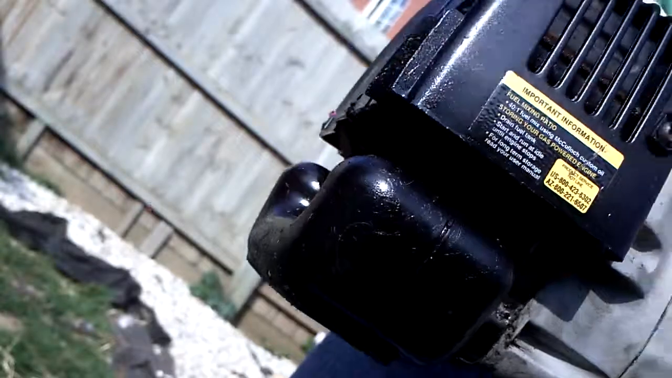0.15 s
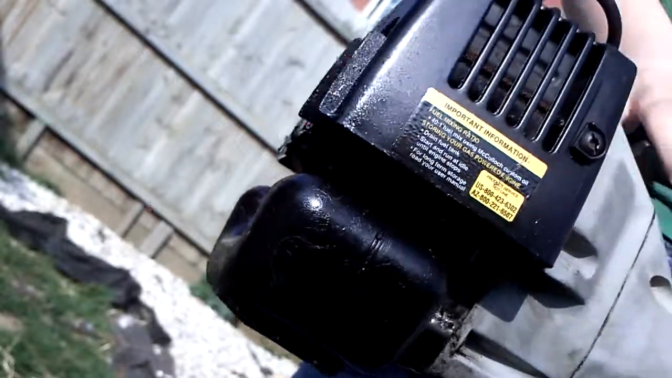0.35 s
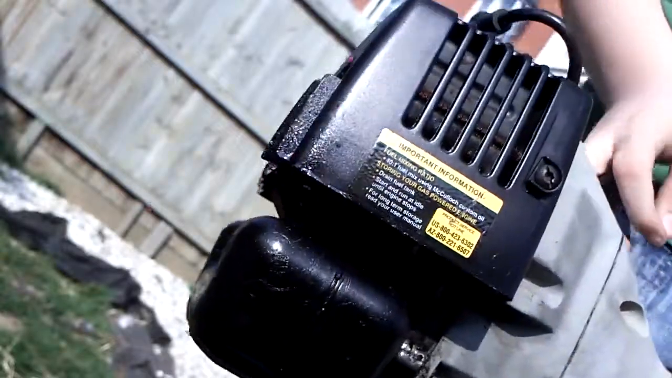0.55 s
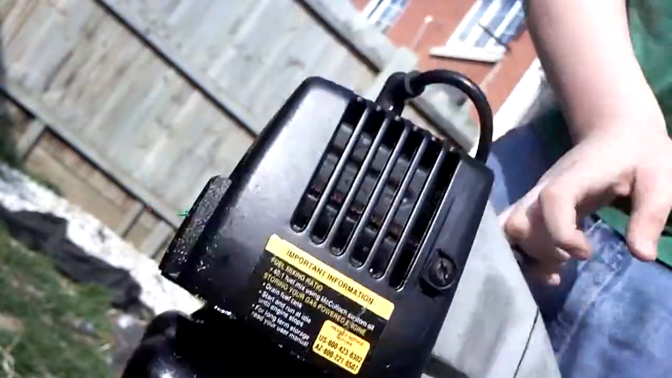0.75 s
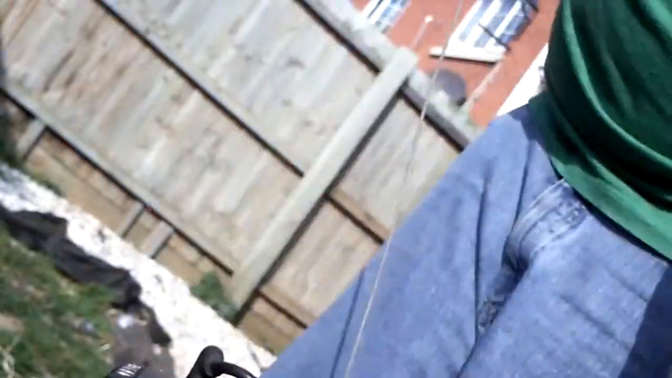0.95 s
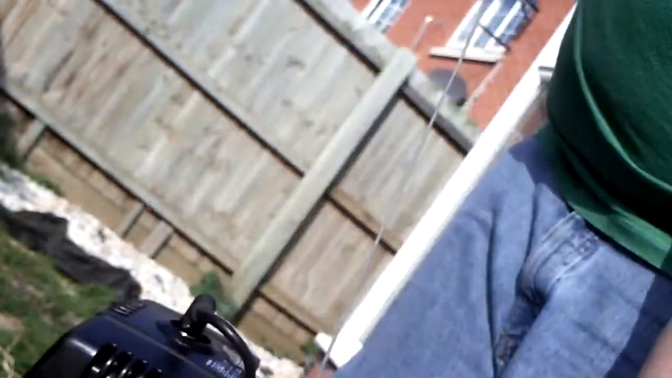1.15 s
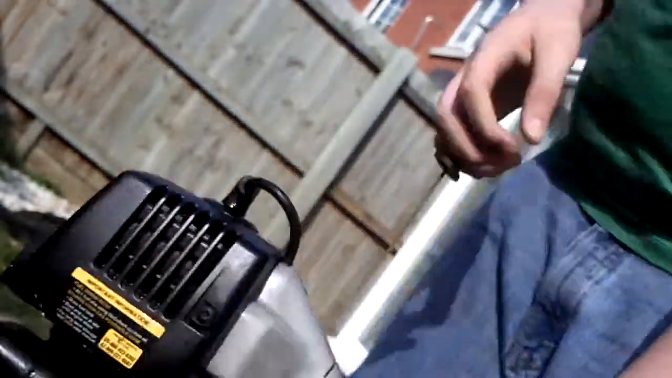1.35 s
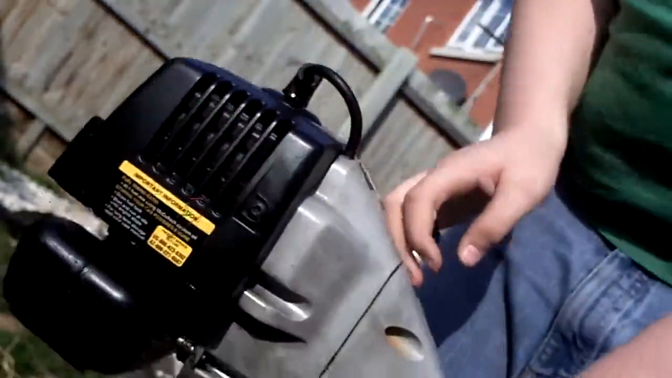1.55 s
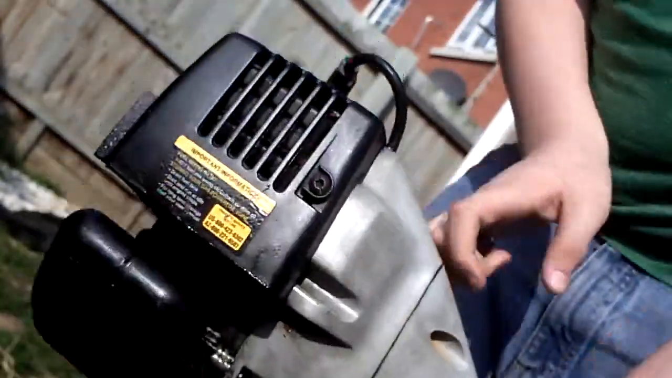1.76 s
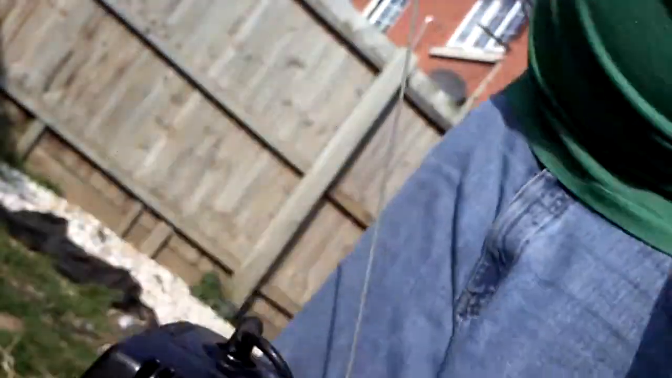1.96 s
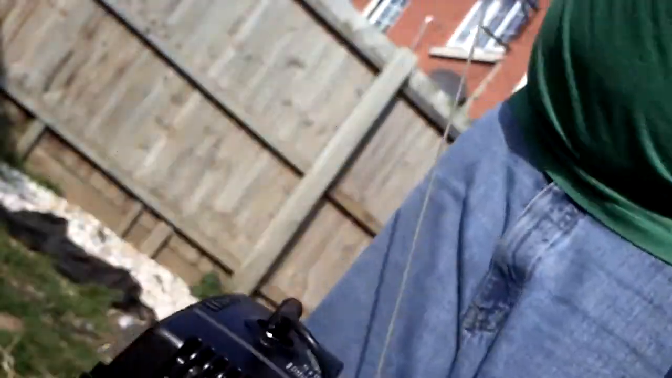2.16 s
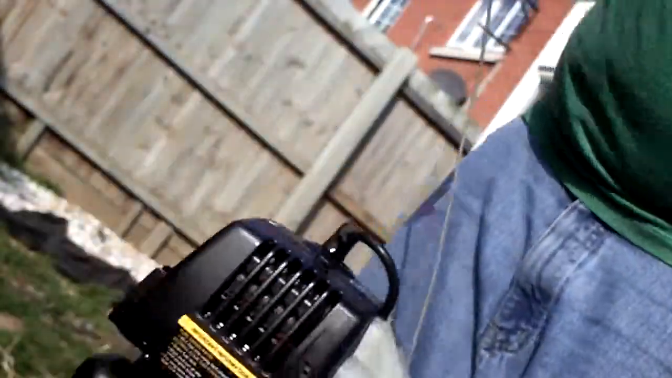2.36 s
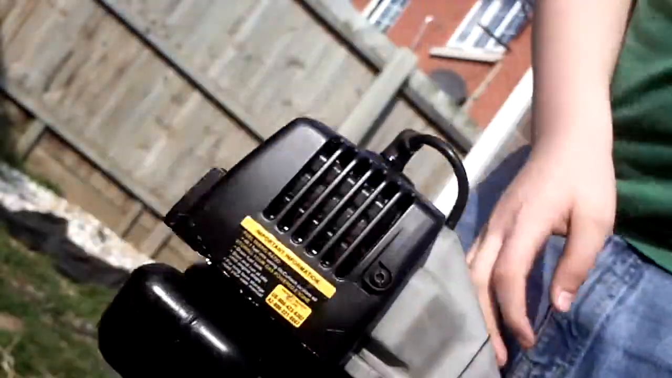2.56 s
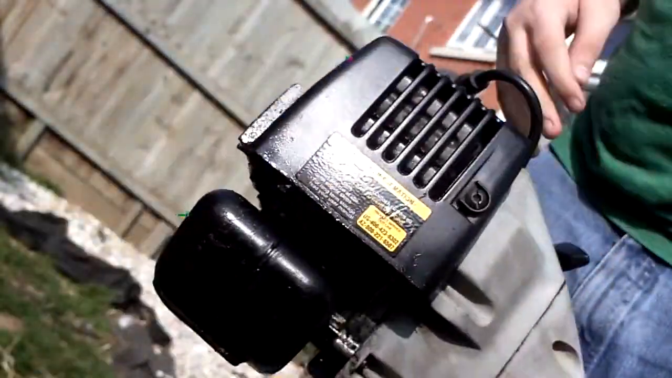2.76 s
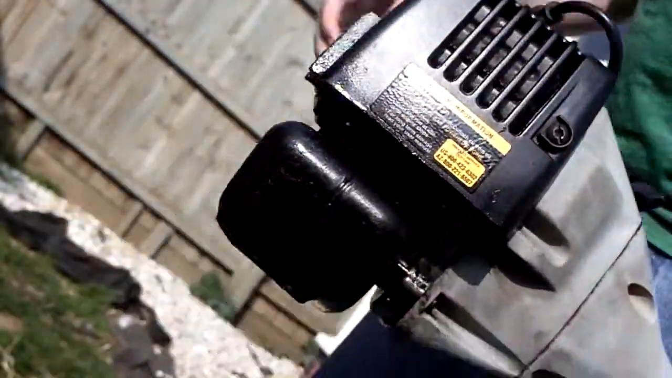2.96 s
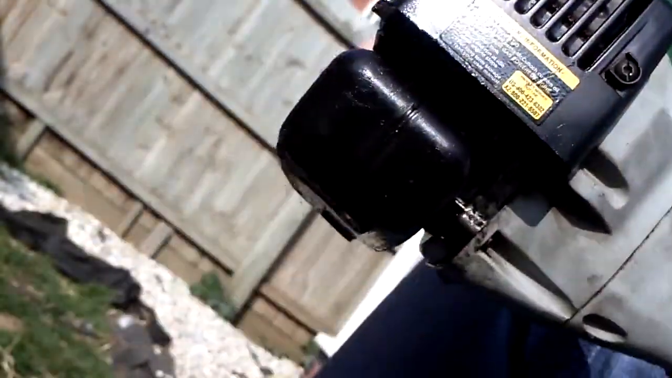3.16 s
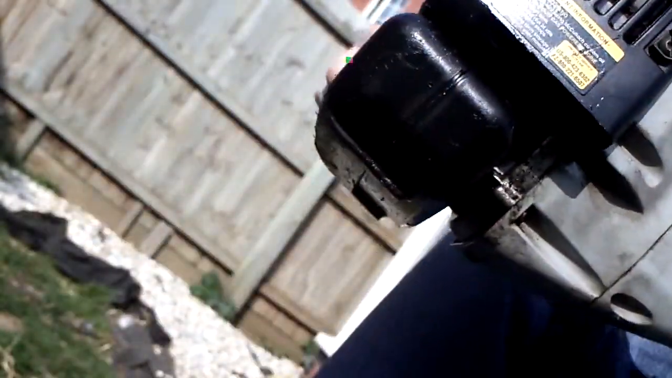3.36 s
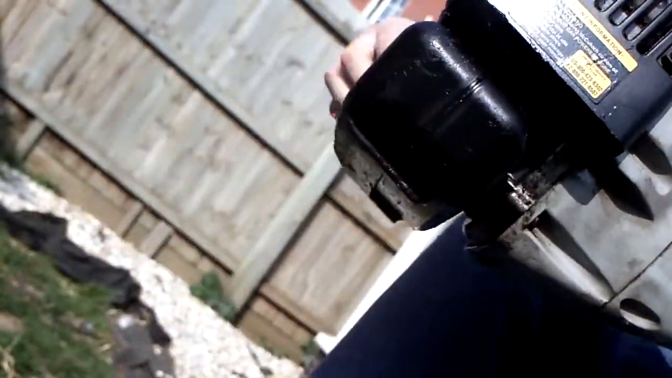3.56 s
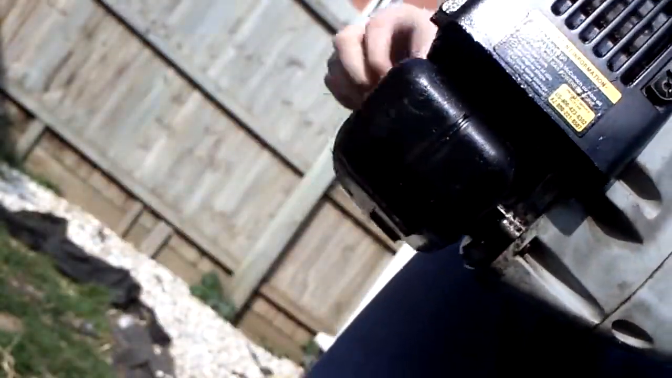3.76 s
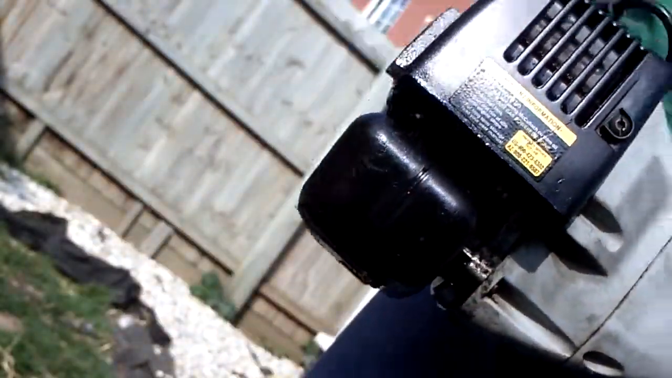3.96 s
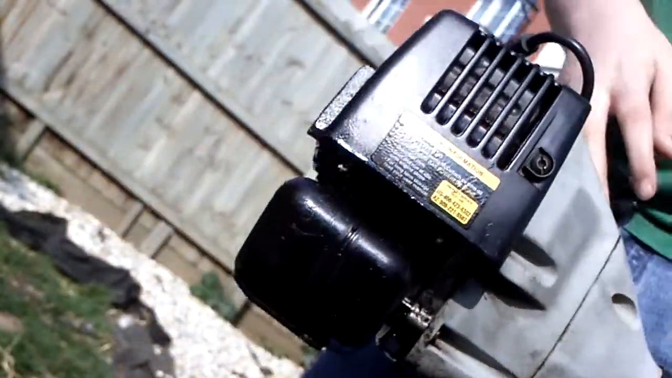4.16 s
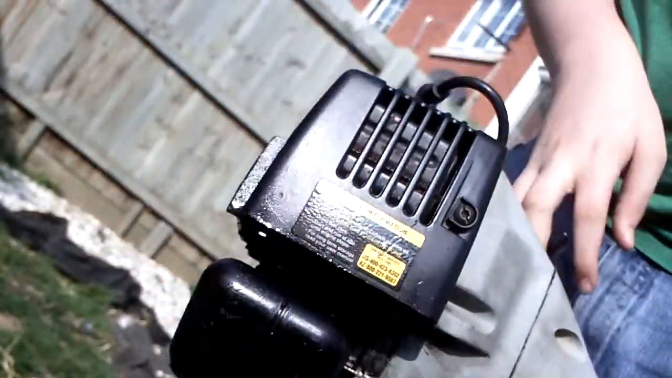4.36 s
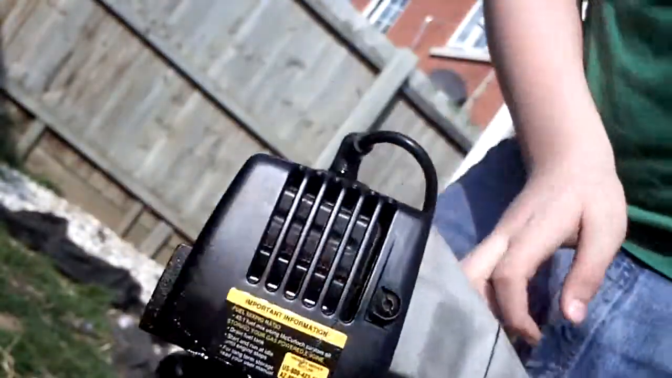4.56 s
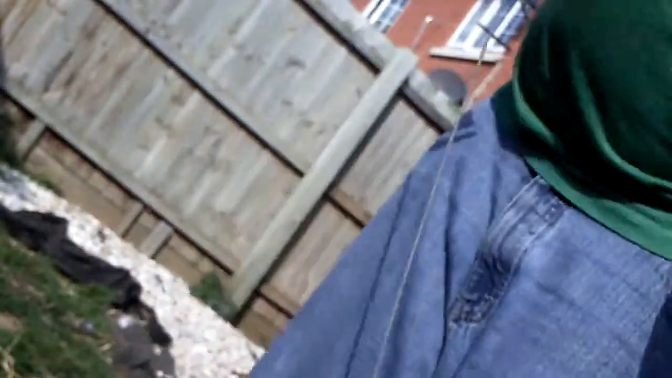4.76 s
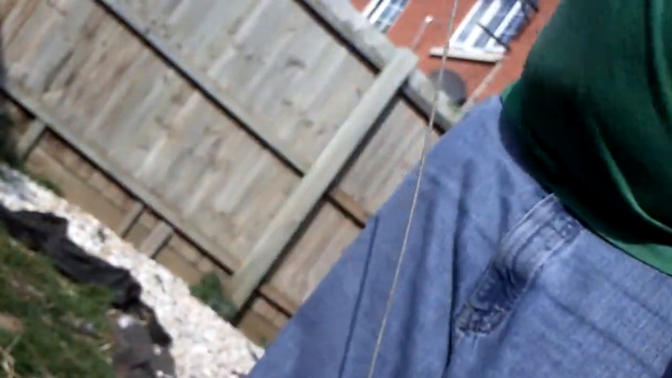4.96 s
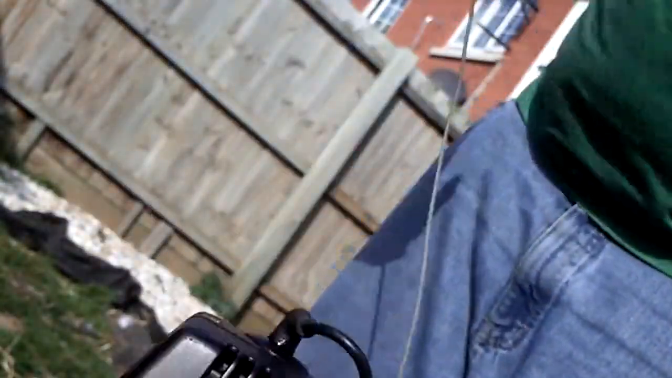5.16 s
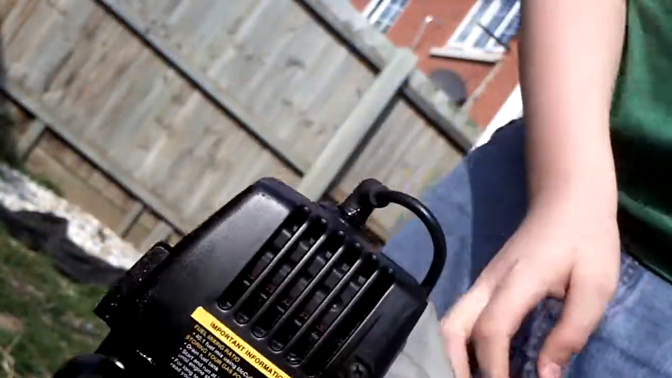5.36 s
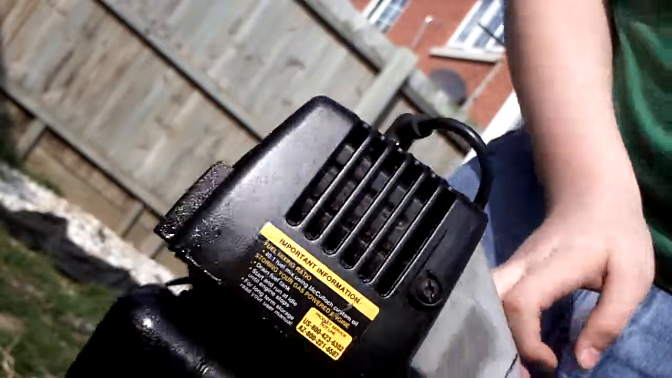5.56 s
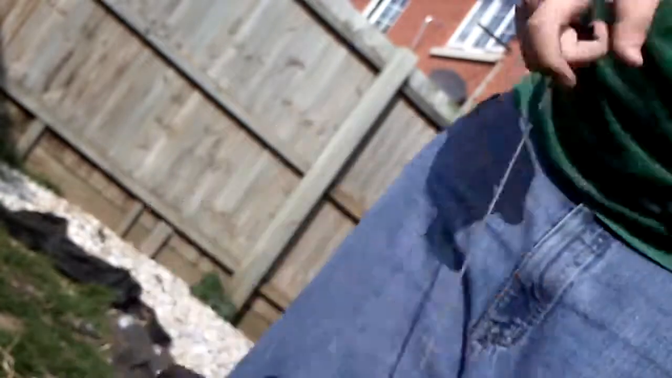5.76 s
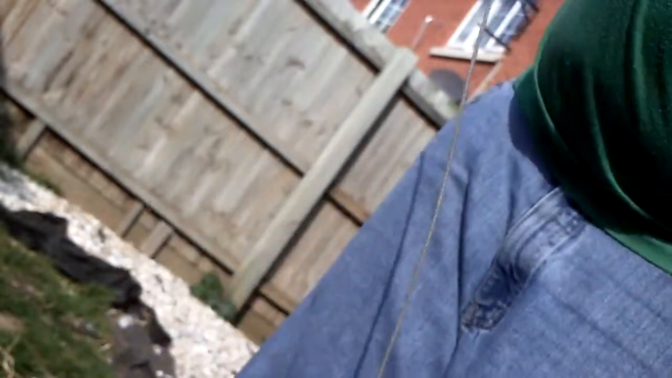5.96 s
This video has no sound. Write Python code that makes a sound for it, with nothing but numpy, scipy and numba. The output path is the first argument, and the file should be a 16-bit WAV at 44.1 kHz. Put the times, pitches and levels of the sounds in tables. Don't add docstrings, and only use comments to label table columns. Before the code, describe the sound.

Faint far traffic and camera hiss open a quiet garden, heard from a close pocket camera. At 0.7 s dogs catch with small clicks and knocks, and the first pull grinds over plastic, with seven or eight quick low piston puffs around 30 per second. From 1.04 s the cord rewinds in a much louder, bright steel-cup rattle, uneven and pulsing, fading by 1.6 s with a couple of clacks. A second pull runs 1.8-2.07 s, its rewind rattling until 2.6 s, ending in soft rope scrape to 2.85 s. Quiet follows, with a small plastic switch click at 3.56 s. The third pull comes at 4.6 s, rewinding very loudly from 4.94 to 5.4 s, then two closing clicks. The fourth pull starts at 5.64 s, with hard knocks and a metallic clang near 5.93 s; its rewind begins with a sharp tick at 5.98 s and is cut off. The engine never fires.

```python
import sys
import numpy as np
from scipy import signal
from scipy.fft import rfft, irfft
from scipy.io import wavfile
from scipy.ndimage import uniform_filter1d, minimum_filter1d
from numba import njit

SR = 44100
rng = np.random.default_rng(int(sys.argv[2]) if len(sys.argv) > 2 else 0)


def field_ratio(decibels):
    return 10 ** (np.asarray(decibels, dtype=float) / 20)


def inscribe(sig):
    pcm = np.round(np.clip(np.atleast_2d(sig).T, -1, 1) * 32767)
    wavfile.write(sys.argv[1], SR, pcm.astype(np.int16))


N = 264952

# [f/Hz, density/dB per Hz]
GARDEN_SPECTRUM = [(15, -33), (25, -1.5), (136, -14.5), (256, -14.5), (600, -11), (958, -4.5),
                   (2480, -20.5), (13800, -23.5)]
GARDEN_DB = -48.5
# [f/Hz, rms level/dB]
WHINE = [(960, -69), (8680, -74)]
SENSOR_FRAME_HZ = 66.056

# [t/s, level/dB]
PULLS = [
    [(.716, -49), (.738, -61), (.752, -32.5), (.794, -42.5), (.808, -23), (.838, -28), (.85, -21),
     (1.01, -25), (1.042, -25.5)],
    [(1.773, -30), (1.789, -41), (1.817, -29), (1.841, -29), (1.867, -23.5), (2.023, -23.5), (2.055, -23),
     (2.066, -25)],
    [(4.601, -27), (4.635, -37), (4.661, -33.5), (4.697, -24), (4.893, -24.5), (4.931, -33), (4.942, -31)],
    [(5.641, -29), (5.671, -47), (5.695, -31.5), (5.703, -25), (5.787, -22.5), (5.945, -25), (5.965, -26)],
]
# [t/s, level/dB]
REWINDS = [
    [(1.042, -20.5), (1.138, -4.5), (1.21, -16), (1.28, -10), (1.322, -5), (1.41, -18.5), (1.51, -38.5),
     (1.64, -58), (1.66, -68)],
    [(2.066, -18), (2.183, -12.5), (2.207, -17.5), (2.24, -11.5), (2.29, -14.5), (2.371, -9),
     (2.565, -29.5), (2.589, -40), (2.64, -52)],
    [(4.942, -20), (4.961, -9), (5.04, -10), (5.09, -2.5), (5.201, -9.5), (5.323, -24), (5.343, -30),
     (5.437, -43.5), (5.5, -80)],
    [(5.965, -23), (5.977, -12.5), (6.008, -18.5)],
]
# [offset/dB, slope/dB per dB of drive, drift/dB per s]
RUMBLE_LAW = [(0, 1.0, -0.5), (-14, 0.78, 1.5)]
RATTLE_LAW = [(-23, 0.97, 56), (0, 1.006, -1)]
GRIND_LAW = [(-3.5, 1.316, -0.5), (-17, .95, -13.5)]
HISS_LAW = [(-9, 1.3, .1), (-14, 0.99, .1)]

# [f/Hz, width/Hz, rumbling level/dB, knocked level/dB]
HOUSING = [(500, 190, -7, -12.5), (734, 250, -0.5, 1), (1170, 120, 0.5, 2), (1460, 180, 0, -6),
           (1920, 250, -0.5, 0.5), (2245, 510, -5.5, -8), (2930, 690, -5, -34)]
# [f/Hz, width/Hz, level/dB]
CUP = [(3845, 21, -12.5), (3970, 99, -13), (4750, 200, -26), (5625, 72, -11), (6760, 99, -9.5),
       (7715, 120, -8), (8918, 154, 1.5), (9190, 164, 0), (9830, 220, -3.5), (9976, 170, -3),
       (10470, 200, -19), (13580, 120, -17)]
# [f/Hz, width/Hz, depth/0-1]
REWIND_GAPS = [(3550, 200, .6), (4400, 450, 1), (5100, 350, .8), (6150, 450, .95), (7200, 250, .7),
               (11600, 500, .8)]
# [f/Hz, level/dB]
GRIND_SPECTRUM = [(200, -25), (1000, 7.5), (3300, 1), (4400, 5), (8500, 3), (10500, 1), (11400, -12),
                  (14000, -26.5)]
# [f/Hz, level/dB]
FAN_SPECTRUM = [(6000, -35), (10300, -5), (11000, -8), (11500, -19), (12100, 2), (13500, 14), (14500, -6)]
# [f/Hz, level/dB]
TICK_SPECTRUM = [(1500, -13), (4000, -7), (6500, -3.5), (8000, 6), (10000, -0.5), (11400, -3.5),
                 (13500, -8)]

# [t/s, steel tick level/dB, housing knock level/dB, knock f/Hz]
CATCHES = [(0.7166, -35.5, -35, 1026), (0.7507, -22.5, -29.5, 1090), (0.8068, -12.5, -12.5, 1150),
           (0.8271, -34, -13, 1163), (1.044, -3.5, -30, 1210), (1.4696, -17, -22, 2170),
           (1.5193, -13.5, -26, 1920), (1.526, -23, -47, 1960), (1.7752, -16.5, -14, 1697),
           (1.8265, -16.5, -14, 1200), (2.0655, -9.5, -21, 1770), (2.5555, -17.5, -36, 1540),
           (4.6024, -9, -24, 1430), (4.6274, -29, -16.5, 678), (4.6374, -28, -25, 880),
           (4.683, -37, -17, 1170), (4.9217, -10.5, -37, 1850), (4.943, -14, -25, 1170),
           (5.352, -12.5, -19, 1936), (5.3869, -18.5, -22.5, 2010), (5.6429, -18, -23, 673),
           (5.6765, -28, -18.5, 1460), (5.698, -11.5, -8, 1210), (5.7136, -30, -16, 1150),
           (5.7258, -26, -12, 1170), (5.9782, 2, -23, 1160)]
# [t/s, steel tick level/dB, housing knock level/dB, knock f/Hz]
KICKS = [(.8442, -24, -15.5, 1970), (.8548, -8.5, -11.5, 1145), (.8879, -5, -9, 1170),
         (.915, -12, -17, 1430), (.9266, -20, -16, 825), (.987, -14, -14, 736), (1.865, -17, -21, 1920),
         (1.8738, -17, -23, 674), (1.9032, -18, -27, 2160), (1.912, -12, -12.5, 734),
         (1.955, -9.5, -19, 1190), (1.9892, -11.5, -18.5, 740), (1.9964, -22, -27, 1390),
         (2.024, -20, -19, 730), (4.7, -33, -13.5, 1410), (4.7369, -19, -19, 1220),
         (4.7421, -23, -18.5, 1170), (4.7767, -17, -14, 670), (4.807, -23, -37, 1390),
         (4.8464, -20, -19.5, 690), (5.7491, -8.5, -9, 1200), (5.762, -13, -19, 1170),
         (5.7889, -5.5, -10, 1200), (5.8025, -21, -21, 1690), (5.8262, -8, -18, 1260),
         (5.8381, -13, -19.5, 1200), (5.8629, -11.5, -17, 1200), (5.8759, -15, -29, 1150),
         (5.9153, -12.5, -29, 1810)]
CATCH_CLANG_OVER_TICK_DB, KICK_CLANG_DB = -22, -28
# [t/s, level/dB]
CLANGS = [
    (0.8447, -23),
    (.915, -19.5),
    (1.955, -19.5),
    (4.683, -24),
    (4.7427, -19.5),
    (4.806, -17.5),
    (4.8464, -23),
    (5.8759, -22),
    (5.9268, -13.5),
]
TEETH_PER_S, TOOTH_JITTER = 78, .3
SKIP_DB, SKIP_SLOPE, SKIP_SCATTER_DB, SKIP_STOP_DB = -1, 0.82, 3.5, -30.5

# [first stroke t/s, top speed/turns per s, driven for/s, strokes/count, level/dB]
CRANK = [
    (.8455, 31.74, .1187, 8, -26),
    (1.8618, 30.17, .1413, 8, -27),
    (4.6894, 26.04, .1535, 7, -25.5),
    (5.7393, 27.21, .1436, 7, -27),
]
LAG_SHARE, LAG_S, COAST_S = .333, .0166, .201
STROKE_DB, SLOWING_DB, STROKE_SCATTER_DB = 0, 12.0, 1.5

# [t/s, level/dB]
SLIDE = [(2.57, -55), (2.596, -52), (2.61, -42.5), (2.69, -40.5), (2.872, -65), (2.88, -76), (2.9, -65)]
# [f/Hz, width/Hz, level/dB]
GUIDE = [(503, 270, -5.5), (1200, 900, -0.5), (2350, 1500, -1), (5000, 600, 3), (6700, 400, -1.5),
         (9000, 700, -18)]

SWITCH_S, SWITCH_DB = 3.557, -22
# [f/Hz, level/dB, t60/s]
SWITCH = [(530, -14.5, 0.055), (1510, -7.5, 0.023), (2160, -3, 0.013), (4720, 3.5, 0.018), (6150, -4, .012),
          (13000, -16.5, .008)]


def unit(x):
    return x / np.sqrt(np.mean(x ** 2))


@njit
def svf(x, hz, width_hz):
    y, b, l = np.empty(len(x)), 0., 0.
    g, k = np.tan(np.pi * hz / SR), width_hz / hz
    for i in range(len(x)):
        v = (b + g * (x[i] + 1e-18 - l)) / (1 + g * (g + k))
        b, l, y[i] = 2 * v - b, l + 2 * g * v, k * v
    return y


def walk(rate_hz):
    place = np.arange(N) * rate_hz / SR
    hold = int(SR / rate_hz)
    held = rng.standard_normal(4000)[place.astype(int)]
    return 1.12 * uniform_filter1d(uniform_filter1d(held, hold), hold)


def colour(x, points):
    hz, db = np.transpose(points)
    f = np.fft.rfftfreq(N, 1 / SR) + 1
    return irfft(rfft(x) * field_ratio(np.interp(np.log(f), np.log(hz), db)), N)


def curve(rows):
    s, db = np.transpose(rows)
    return field_ratio(np.interp(np.arange(N) / SR, s, db, -140, -140))


def part(law):
    t, gain = np.arange(N) / SR, np.zeros(N)
    for tables, (offset_db, slope, drift_db_per_s) in zip((PULLS, REWINDS), law):
        for rows in tables:
            s, db = np.transpose(rows)
            on = (t >= s[0]) & (t < s[-1])
            drive_db = np.interp(t[on], s, db)
            gain[on] = field_ratio(offset_db + slope * drive_db + drift_db_per_s * (t[on] - s[0]))
    return gain


def impacts(rate_hz, spread_db):
    chance = rng.random((2, N))
    size = field_ratio(-spread_db * np.log(chance[1] + 0.021))
    sign = np.sign(rng.standard_normal(N))
    return unit((chance[0] < rate_hz / SR) * size * sign)


def blows(times_s, levels_db, rise_s, decay_s):
    spikes = np.zeros(N)
    np.add.at(spikes, (np.array(times_s) * SR).astype(int), field_ratio(np.array(levels_db)))
    t = np.arange(SR // 20) / SR
    shape = np.minimum(t / rise_s, 1) * np.exp(-t / decay_s)
    return signal.fftconvolve(spikes, shape)[:N]


def ring(force, modes, column, patchy_db, rate_hz):
    out = np.zeros(N)
    for mode in modes:
        hz, width_hz = 1. * mode[0], 1. * mode[1]
        gain = field_ratio(mode[column] + patchy_db * walk(rate_hz)) / np.sqrt(width_hz)
        out += gain * svf(force, hz, width_hz)
    return out


def cup_ring(force, patchy_db, rate_hz):
    scale = 1 / np.std(ring(rng.standard_normal(N), CUP, column=2, patchy_db=0, rate_hz=30))
    return scale * ring(force, CUP, 2, patchy_db, rate_hz)


def tones(times_s, hz, levels_db, t60_s):
    out, t = np.zeros(N + SR), np.arange(SR // 10) / SR
    shape = np.minimum(t / 0.0017, 1) * np.exp(-np.log(1000) * t / t60_s)
    for s, f, db in zip(times_s, hz, levels_db):
        start = int(s * SR)
        out[start:start + len(t)] += field_ratio(db) * shape * np.sin(2 * np.pi * f * t)
    return out[:N]


def garden():
    t = np.arange(N) / SR
    air = unit(colour(rng.standard_normal(N), GARDEN_SPECTRUM))
    traffic = svf(air, 890.0, 1230.0)
    swell = field_ratio(1.5 * walk(3.14) + 1.0 * walk(16)) - 1
    read_out = np.exp(3.5 * (np.cos(2 * np.pi * SENSOR_FRAME_HZ * t - .8) - 1))
    dips = np.minimum(.75 * read_out, .48)
    hiss = colour(air, [(1500, -40), (2500, 0), (14000, 0)])
    whine = np.zeros(N)
    for hz, db in WHINE:
        whine += field_ratio(db + 5.5 + 2.5 * walk(4.1)) * np.sin(2 * np.pi * hz * t + 0.45 * walk(20))
    return field_ratio(GARDEN_DB) * (air - dips * hiss + traffic * swell) + whine


def rumble(bounce):
    force = impacts(2200, 2.24) * np.sqrt(bounce)
    body = ring(force, HOUSING, column=2, patchy_db=4.5, rate_hz=40)
    body = colour(body, [(60, -11.0), (130, -12), (300, -10.5), (550, 1.0), (3300, 2), (4300, -32.0)])
    return field_ratio(-0.5) * part(RUMBLE_LAW) * unit(body)


def rattle(bounce, skips, after):
    drive = field_ratio(-2.5) * bounce * part(RATTLE_LAW) + skips + field_ratio(-16) * after
    return field_ratio(-1.5) * cup_ring(impacts(5000, 1.0) * drive, patchy_db=3.0, rate_hz=45)


def grind(bounce):
    return field_ratio(7.0) * unit(colour(impacts(6000, 4.6), GRIND_SPECTRUM)) * np.sqrt(bounce) * part(GRIND_LAW)


def hiss(bounce, skips, after):
    drive = np.sqrt(bounce) * part(HISS_LAW) + field_ratio(-20) * after + field_ratio(-16.5) * skips
    return field_ratio(-3.0) * unit(colour(impacts(6000, 2.2), FAN_SPECTRUM)) * drive


def shake():
    judder = svf(svf(rng.standard_normal(N), 90., 118.0), 90., 118.0)
    return field_ratio(-43.0) * part(RATTLE_LAW) * unit(judder)


def ticks(s, tick_db):
    burst = rng.standard_normal(N) * blows(s, tick_db, .002, .004)
    return field_ratio(-1) * colour(burst, TICK_SPECTRUM) + field_ratio(-12) * cup_ring(burst, patchy_db=2.5, rate_hz=52)


def knocks(s, knock_db, knock_hz):
    burst = rng.standard_normal(N) * blows(s, knock_db, 0.0016, 0.0041)
    body = ring(burst, HOUSING, column=3, patchy_db=3.0, rate_hz=69)
    return field_ratio(28.5) * body + tones(s, knock_hz, knock_db + 1.0, 0.039)


def clangs(s, tick_db):
    is_catch = np.arange(len(s)) < len(CATCHES)
    db = np.where(is_catch, tick_db + CATCH_CLANG_OVER_TICK_DB, KICK_CLANG_DB)
    hard_s, hard_db = np.transpose(CLANGS)
    hz = 3880 + 70 * rng.standard_normal(len(s))
    hard_hz = 3880 + 70 * rng.standard_normal(len(hard_s))
    return tones(s, hz, db + 1.0, 0.047) + tones(hard_s, hard_hz, hard_db + 1.5, 0.056)


def teeth():
    jitter, scatter = rng.standard_normal((2, 800))
    s = np.cumsum(np.exp(TOOTH_JITTER * jitter) / TEETH_PER_S)
    drives_db = [np.interp(s, *np.transpose(rows), -140, -140) for rows in REWINDS]
    drive_db = np.max(drives_db, axis=0)
    db = SKIP_DB + SKIP_SLOPE * drive_db + SKIP_SCATTER_DB * scatter
    on = drive_db > SKIP_STOP_DB
    return s[on], db[on]


def hollow(x, share):
    for hz, width_hz, depth in REWIND_GAPS:
        cut = np.clip(depth * (.85 + .3 * walk(14)), 0, .98)
        x = x - share * cut * svf(x, 1. * hz, 1. * width_hz)
    return x


def starter():
    s, tick_db, knock_db, knock_hz = np.transpose(CATCHES + KICKS)
    after = blows(s, tick_db, 0.0012, 0.01)
    bounce = unit(field_ratio(1.55 * walk(130) + 2.9 * walk(30)))
    skips = field_ratio(1.0) * blows(*teeth(), 0.0018, 0.0044)
    rewinding = uniform_filter1d(np.minimum(skips * 20, 1), size=800)
    rubbing = rumble(bounce) + rattle(bounce, skips, after) + grind(bounce) + hiss(bounce, skips, after)
    hits = ticks(s, tick_db) + knocks(s, knock_db, knock_hz) + clangs(s, tick_db)
    return hollow(rubbing + hits, rewinding) + shake()


def strokes():
    age, rows = np.arange(SR) / SR, []
    for first_s, top_hz, driven_s, count, db in CRANK:
        coast = np.exp(-np.maximum(age - driven_s, 0) / COAST_S)
        speed_hz = top_hz * (1 - LAG_SHARE * np.exp(-age / LAG_S)) * coast
        turns = np.cumsum(speed_hz) / SR
        at = np.interp(np.arange(count), turns, age)
        slowing_db = SLOWING_DB * np.log10(np.interp(at, age, coast))
        rows.append([first_s + at, db + STROKE_DB + slowing_db])
    s, db = np.hstack(rows)
    return s, db + STROKE_SCATTER_DB * rng.standard_normal(len(s))


def piston():
    t = np.arange(-400, 401) / SR
    wave = np.exp(-(t / 0.0026) ** 2) * np.cos(2 * np.pi * 200 * t + 0.71)
    s, db = strokes()
    spikes = np.zeros(N)
    spikes[(s * SR).astype(int)] = field_ratio(db - 4.0)
    puffs = np.convolve(spikes, wave, "same")
    boom = field_ratio(2.5) * svf(puffs, 110.0, 35.0)
    breath = unit(svf(svf(rng.standard_normal(N), 290.0, 300.0), 290.0, 300.0))
    return puffs + boom + blows(s - .004, db - 10.0, 0.0057, 0.029) * breath


def rope():
    scrape = ring(impacts(8000, 1.6), GUIDE, column=2, patchy_db=4.0, rate_hz=29)
    return field_ratio(4.0) * curve(SLIDE) * unit(scrape)


def switch():
    t = np.maximum(np.arange(N) / SR - SWITCH_S, 0)
    modes = np.zeros(N)
    for hz, db, t60_s in SWITCH:
        modes += field_ratio(db) * np.exp(-np.log(1000) * t / t60_s) * np.sin(2 * np.pi * hz * t)
    scuff_gain = np.exp(-t / 0.005) * field_ratio(-8) + np.exp(-t / 0.045) * field_ratio(-19)
    scuff = svf(rng.standard_normal(N), 2200.0, 4400.0) * scuff_gain
    return field_ratio(SWITCH_DB) * (modes + scuff) * np.minimum(t / 0.0026, 1)


def echo(x):
    t = np.arange(SR // 4) / SR
    tail = rng.standard_normal(len(t)) * np.exp(-t / 0.03) * (t > .006)
    tail += field_ratio(-6.5) * svf(tail * np.exp(t / 0.036), 3070.0, 470.0)
    return field_ratio(-13.5) * signal.fftconvolve(x, tail / np.sqrt(np.sum(tail ** 2)))[:N]


def scene():
    machine = starter() + piston() + rope()
    return (garden() + machine + echo(machine) + switch())[None]


def low_pass(x):
    return signal.sosfilt(signal.butter(12, 15320, fs=SR, output="sos"), x)


def record(dry):
    room = minimum_filter1d(np.minimum(.77 / (np.abs(dry[0]) + 1e-9), 1), size=121)
    held = dry[0] * uniform_filter1d(room, size=121)
    cut = colour(held, [(13930, 0), (14060, -60)])
    return low_pass(np.clip(cut, -.73, .73))


dry = scene()
out = record(dry)
inscribe(out)
```